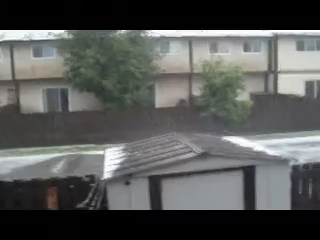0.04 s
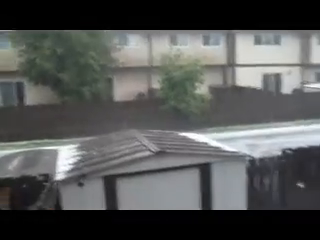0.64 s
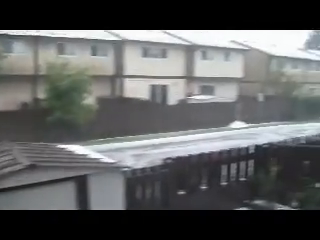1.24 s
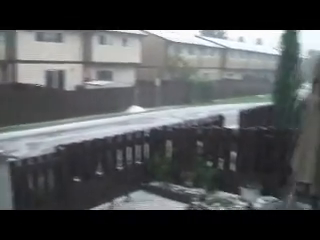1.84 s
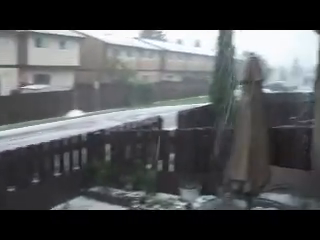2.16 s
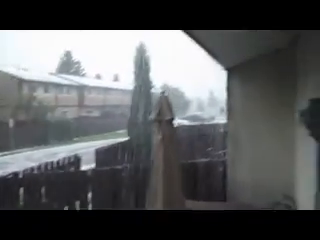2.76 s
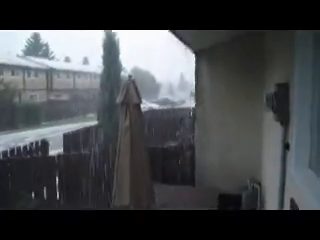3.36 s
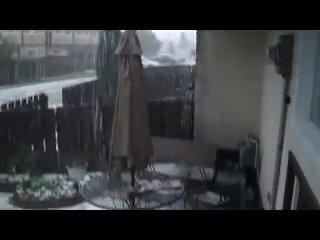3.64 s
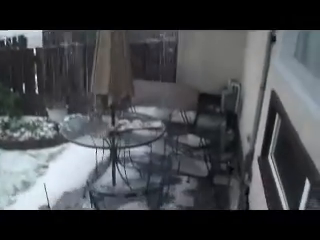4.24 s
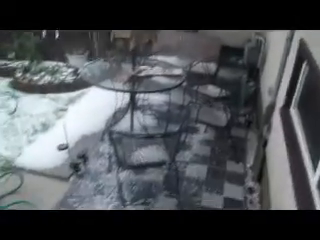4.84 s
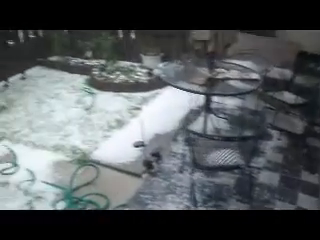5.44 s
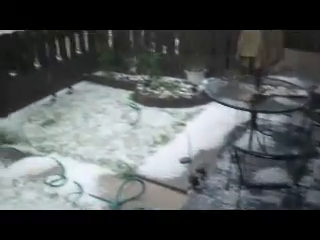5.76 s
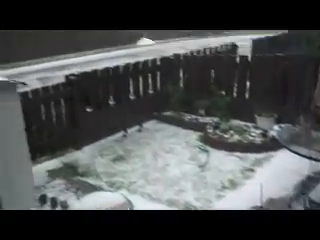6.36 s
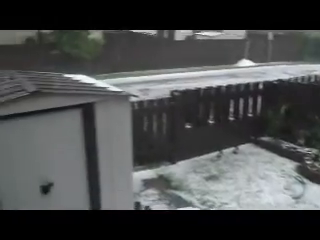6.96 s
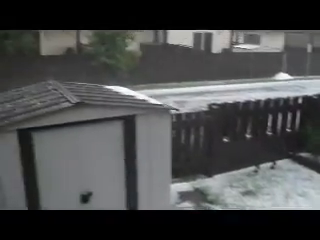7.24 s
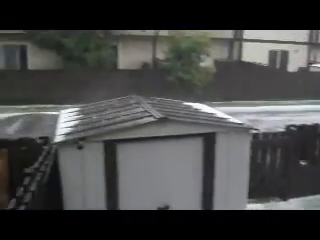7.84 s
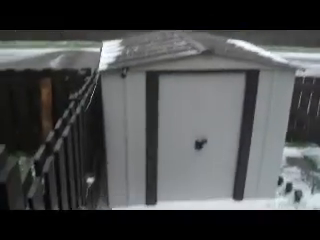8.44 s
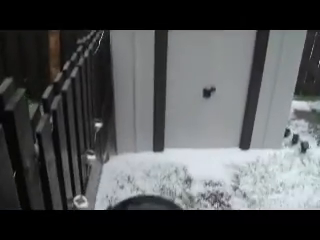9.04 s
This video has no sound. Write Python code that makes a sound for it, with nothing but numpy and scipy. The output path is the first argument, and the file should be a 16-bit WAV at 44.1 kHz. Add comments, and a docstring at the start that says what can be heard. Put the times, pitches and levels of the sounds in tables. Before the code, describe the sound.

Heavy hail and rain pelt a backyard, drumming on roofs while close stones crack sharply and ping off metal.

```python
"""Backyard hailstorm

Heavy hail and rain, taken in mono on a small microphone under the eaves. At the back the shed and
house roofs drum; across the yard countless small stones patter and shatter on paving and fence.
Close in, big ones crack and ring sheet metal. The first second fades up; the loudest cracks clip."""
import sys
import numpy as np
from scipy import signal
from scipy.fft import rfft, irfft
from scipy.io import wavfile
from scipy.ndimage import uniform_filter1d

SR = 44100
rng = np.random.default_rng(int(sys.argv[2]) if len(sys.argv) > 2 else 0)


def master(y):
    """Save y as 16-bit WAV."""
    cut = np.clip(np.atleast_2d(y).T, -1, 1)
    pcm = np.round(cut * 32767)  # scale
    wavfile.write(sys.argv[1], SR, pcm.astype(np.int16))


N = 405279
TIME = np.arange(N) / SR


def undb(db):
    """Decibels to gain."""
    return 10 ** (np.asarray(db) / 20)


def unit(x):
    """Scale to rms 1."""
    return x / np.sqrt(np.mean(x ** 2))


def gains(curve):
    """The dB columns of a timed curve as gains, sample by sample."""
    times, *columns = np.transpose(curve)
    return [undb(np.interp(TIME, times, db)) for db in columns]


def decay(t60, size=16384):
    """Exponential fall of 60 dB in t60 seconds."""
    return np.exp(-np.log(1000) * TIME[:size] / t60)


def ring(hz, t60, size=16384):
    """One struck mode: a damped sine."""
    return np.sin(2 * np.pi * hz * TIME[:size]) * decay(t60, size)


def through(x, response):
    """Convolve with an impulse response."""
    return signal.oaconvolve(x, response)[:N]


def add(out, s, sound):
    """Mix a sound in at s seconds."""
    start = int(np.clip(s * SR, 0, N - 1))
    out[start:start + len(sound)] += sound[:N - start]


def colour(spectrum, size=8192):
    """Minimum-phase impulse response with the given spectrum."""
    hz, db = np.transpose(spectrum)
    bins = np.maximum(np.fft.rfftfreq(size, 1 / SR), 1)
    magnitude = undb(np.interp(np.log(bins), np.log(hz), db))
    cepstrum = irfft(np.log(magnitude))
    cepstrum[1:size // 2] *= 2
    cepstrum[size // 2 + 1:] = 0
    return irfft(np.exp(rfft(cepstrum)))


def impacts(per_s, spread_db):
    """Randomly timed blows: many small, a few large."""
    hits = rng.random(N) < per_s / SR
    sizes = undb(spread_db * np.minimum(rng.exponential(size=N), 5))
    return hits * sizes * rng.choice([-1, 1], N)


def yard(direct, t60, echo_db):
    """Walls and fence return each blow to the microphone as a short diffuse tail."""
    tail = decay(t60) ** 2
    energy = np.abs(through(direct ** 2, tail / tail.sum()))
    return direct + undb(echo_db) * np.sqrt(energy) * rng.standard_normal(N)


# Spectrum of the roofs at the back: f/Hz, level/dB
ROOF_SPECTRUM = [(60, -26), (145, -12), (190, 1.5), (220, -1.5), (255, -4), (350, -2), (450, -1), (530, 2),
                 (660, -1), (780, .5), (1000, -1.5), (1250, 0), (1750, -4.5), (2400, -18.5), (4000, -53.5)]
def roofs():
    """Farthest off, blows on the shed and house roofs merge into a hollow drumming."""
    blows = impacts(per_s=1100, spread_db=2.5)
    return unit(through(yard(blows, t60=0.11, echo_db=-3), colour(ROOF_SPECTRUM)))


# Spectrum of the shed panels: f/Hz, level/dB
PANEL_SPECTRUM = [(22, 3), (35, -22), (50, 8), (68, 5.5), (97, 1.5), (118, 4.5), (145, -9), (220, -32)]
def shed_boom():
    """Behind the yard, the wide shed panels answer the pelting with a low boom."""
    return unit(through(impacts(per_s=670, spread_db=3.0), colour(PANEL_SPECTRUM)))


# Spectrum of splashes on the patio: f/Hz, level/dB
SPLASH_SPECTRUM = [(4000, -43), (7500, 3), (9500, 6.5), (12200, 7), (14000, 5), (15500, -3)]
def spray():
    """Out on the wet patio, raindrops and slush splash with a fine bright fizz."""
    drops = impacts(per_s=8100, spread_db=5.0)
    return unit(through(yard(drops, t60=0.062, echo_db=-2.0), colour(SPLASH_SPECTRUM)))


# Modes of the sheet metal: f/Hz, relative level/dB, t60/s
METAL_MODES = [(1210, -14.5, 0.055), (2110, -14, 0.039), (2440, -13, .06), (2728, -4.5, 0.04)]
def metal_tinkle():
    """Over by the shed, sheet metal tinkles; every spot that is hit favours another mode."""
    out = np.zeros(N)
    for hz, db, t60 in METAL_MODES:
        blows = impacts(per_s=120, spread_db=2.5)
        out += undb(db) * unit(through(blows, ring(hz, t60)))
    return unit(out)


def flurries(per_s, t60, depth):
    """A gain that surges as each bursting stone throws splinters, which quickly thin out."""
    showers = through(np.abs(impacts(per_s, spread_db=4.0)), decay(t60))
    return np.sqrt(1 + depth * np.abs(showers) / showers.mean())


# Spectrum of small ice landing in the yard: f/Hz, level/dB
ICE_SPECTRUM = [(700, -17), (1400, -17), (2100, -8), (2900, -5.5), (3700, -4.5), (4500, -1.5), (6200, 0.5),
                (7200, -2), (8500, -7), (10000, -12.5), (15500, -22.5)]
def patter():
    """In the middle distance, small hail peppers paving, fence and lawn."""
    ticks = impacts(per_s=12000, spread_db=2.5) * flurries(per_s=160, t60=0.034, depth=0.84)
    return unit(through(yard(ticks, t60=0.044, echo_db=-3.5), colour(ICE_SPECTRUM)))


def crack(hz, cycles, size=1536):
    """Ice on a hard surface: a pitched snap that peaks after `cycles` periods, then dies."""
    age = TIME[:size] * hz / cycles
    return age * np.exp(1 - age) * np.sin(2 * np.pi * hz * TIME[:size])


def pellets(mid_hz, octaves, cycles, spread_db, count):
    """Single stones stand forward of the patter, each with the pitch of its size."""
    out = np.zeros(N)
    for when, rank, up, length, down in rng.random((count, 5)):
        hz = np.clip(mid_hz * 2 ** (octaves * (up - down)), 800, 13000)
        db = -spread_db * np.log(max(rank, .02))
        add(out, when * N / SR, undb(db) * crack(hz, cycles * (.5 + length)))
    return out


# Hits on sheet metal, garden furniture or a shed panel: t/s, level/dB before trim, f/Hz, t60/s
PLATE_HITS = [(1.34, -19, 2050, 0.11), (1.36, -24, 1190, 0.12), (1.782, -22, 2750, 0.13),
              (2.625, -15, 2410, 0.07), (2.821, -20, 1190, 0.21), (3.771, -34.5, 90, 0.45),
              (5.36, -17, 2790, 0.072), (6.045, -19, 2210, 0.1), (6.301, -31.5, 260, .22),
              (6.495, -18, 2780, 0.082), (7.026, -20, 2690, .1), (7.372, -19, 2130, 0.11),
              (7.43, -19, 2130, .08), (7.445, -18, 2720, 0.093), (8.096, -24, 2750, 0.097),
              (8.196, -18.5, 2730, 0.12), (8.25, -19, 2770, .1)]
def pings(trim_db, detune, neighbour_db):
    """Nearby, a stone rings one mode of a thin plate; two neighbours beat with it and die sooner."""
    out = np.zeros(N)
    for s, db, hz, t60 in PLATE_HITS:
        up, down = detune * (.5 + rng.random(2))
        neighbours = ring(hz * (1 + up), t60 / 2) + ring(hz * (1 - down), t60 / 2)
        add(out, s, undb(db + trim_db) * (ring(hz, t60) + undb(neighbour_db) * neighbours))
    return out


# Big stones landing close: t/s, crack level/dB, f/Hz, splinter level/dB (levels before trim)
CLOSE_STONES = [(0.5375, 4, 6570, -9.5), (0.6095, 0, 6760, -6), (0.8791, -1, 6720, -10.5),
                (0.909, 1, 4800, -8), (1.0108, -6, 5930, -13), (1.032, -1.5, 6210, -11.5),
                (1.201, -2, 7430, -17.5), (1.245, -6, 5870, -8.5), (1.406, -5, 4830, -12),
                (1.5121, 5, 7360, -23), (1.754, -3, 5970, -15), (2.03, -3, 6350, -17),
                (2.095, -4, 6400, -11.5), (2.1952, 2, 6680, -14.5), (2.3825, 0, 6430, -16),
                (3.1788, -10, 6110, -12.5), (3.6537, -7, 6060, -11), (4.1597, 2, 4600, -27),
                (4.3006, 9, 7400, -14), (4.3695, -1, 6270, -12.5), (4.795, 6, 5830, -20),
                (4.9841, 0, 9990, -12), (5.3473, -5, 6000, -11.5), (5.456, 3, 5870, -22),
                (5.498, 2, 6630, -23), (5.5535, 3, 5530, -27), (5.8685, -2.5, 5880, -12),
                (5.9384, 2.5, 7080, -23.5), (6.342, 5.5, 7460, -17), (6.752, 5, 5300, -17),
                (6.836, -3, 6320, -12), (6.94, -6, 5010, -15), (7.0804, -2.5, 6440, -31),
                (7.1478, -11, 6390, -12), (7.1835, -10, 4550, -10), (7.285, 0, 6130, -13.5),
                (7.4146, -6, 6580, -11), (7.4433, -8, 5350, -15), (7.5272, -8, 4560, -11),
                (7.5513, -4, 6270, -16), (7.684, -6, 5380, -8.5), (7.7614, -1, 5200, -8),
                (7.939, -5, 5870, -10.5), (8.091, 3.5, 5660, -10), (8.2155, 1, 5800, -14),
                (8.3907, 5, 5100, -24), (8.469, -5, 5240, -13.5), (8.5793, -6, 6310, -9),
                (8.6176, -7, 5890, -7.5), (8.7974, -3, 5700, -12.5), (8.952, -4, 4970, -13),
                (8.9771, -4, 5640, -14.5), (9.0026, 3, 5640, -16.5), (9.023, -1, 6510, -16),
                (9.1443, -1, 5500, -10.5)]
def big_stones(crack_trim_db, splinter_trim_db, cycles, stretch, scatter_t60):
    """Close to the microphone a stone cracks and scatters; the more it shatters, the longer the crack."""
    out = np.zeros(N)
    splinters = unit(through(impacts(per_s=5100, spread_db=1), colour(ICE_SPECTRUM)))
    thinning = decay(scatter_t60)
    typical_db = np.median(np.array(CLOSE_STONES)[:, 3])
    for s, crack_db, hz, splinter_db in CLOSE_STONES:
        rise_cycles = cycles * undb(stretch * (splinter_db - typical_db))
        shower = thinning * np.roll(splinters, -int(s * SR))[:len(thinning)]
        add(out, s - rise_cycles / hz, undb(crack_db + crack_trim_db) * crack(hz, rise_cycles))
        add(out, s, undb(splinter_db + splinter_trim_db) * shower)
    return out


def clumps(spread_db, per_s=17):
    """Stones arrive in clumps: a gain that glides between random levels."""
    hold = int(SR / per_s)
    steps = np.repeat(rng.standard_normal(N // hold + 1), hold)
    return undb(spread_db * unit(uniform_filter1d(steps, hold)[:N]))


def facing(s, width_s, lift_db):
    """A surface comes up in level as the microphone swings past it, on axis at s seconds."""
    return undb(lift_db * np.exp(-((TIME - s) / width_s) ** 2))


# The fall swells and slackens in squalls: t/s, ground level/dB, roof level/dB (before the mix gains)
SQUALLS = [(0.9, -16, -27), (1.1, -19, -29.5), (1.34, -14, -25.0), (1.54, -19.5, -30), (1.76, -13.5, -26.5),
           (2.02, -18.7, -29), (2.44, -18.0, -33.5), (2.48, -16, -29), (3.92, -17, -29), (4.3, -16, -30),
           (4.44, -17.5, -29.5), (4.74, -14.5, -27.5), (4.84, -21.5, -33.5), (4.96, -17.0, -29),
           (5.98, -18.5, -32.0), (6.28, -16.5, -28), (6.56, -19, -34), (6.94, -15.5, -27.2),
           (7.26, -17.5, -30.2), (7.76, -17, -26.8), (7.86, -20, -31.5), (8.1, -15.5, -29.5),
           (8.14, -19.5, -29), (9.18, -17.0, -30.7)]
def scene():
    """From under the eaves: squalls drive the roofs and the yard, with the close hits in front."""
    on_ground, on_roofs = gains(SQUALLS) * clumps(spread_db=0.91)
    on_patio = on_ground * facing(s=4.3, width_s=3.5, lift_db=5.0)
    on_shed = on_roofs * clumps(spread_db=0.5) * undb(-0.5 * TIME)  # eases by 0.5 dB a second
    toward_shed = facing(s=7.9, width_s=0.9, lift_db=3.5)
    clacks = pellets(mid_hz=5400, octaves=0.73, cycles=0.88, spread_db=2.5, count=1100)  # wood, plastic
    ticks = pellets(mid_hz=6700, octaves=0.88, cycles=0.64, spread_db=1.5, count=350)  # hard paving
    snaps = pellets(mid_hz=7500, octaves=0.46, cycles=0.81, spread_db=0.5, count=55)  # nearest slabs
    # glass and wire furniture ring longer
    clinks = pellets(mid_hz=5900, octaves=0.55, cycles=21, spread_db=2.5, count=400)
    ice = undb(-0.36) * patter() + undb(-1.5) * clacks + undb(5.0) * ticks + undb(8.8) * snaps
    ice += undb(-9) * clinks + undb(-20) * toward_shed * metal_tinkle()
    near = big_stones(crack_trim_db=-1.5, splinter_trim_db=0.5, cycles=1.3, stretch=0.52,
                      scatter_t60=0.072)
    near += pings(trim_db=0.5, detune=0.042, neighbour_db=-8.5)
    far = undb(-1.11) * on_roofs * clumps(spread_db=1.03) * roofs()
    far += undb(-12) * on_shed * shed_boom()
    middle = on_ground * ice + undb(-15) * on_patio * spray()
    mix = far + middle + near
    return np.array([mix, mix])


# The microphone channel fading up: t/s, level/dB
FADE_UP = [(0.21, -31), (0.4, -22), (0.6, -10), (0.74, -7), (0.79, -4), (0.95, -0.5)]
def record(dry):
    """The microphone channel opens a moment late, fades up, clips the loudest cracks and cuts the top."""
    start_s, ceiling, top_hz = 0.203, 0.93, 15600
    opening, = gains(FADE_UP)
    clipped = np.clip(dry * opening * (TIME > start_s), -ceiling, ceiling)
    lowpass = signal.firwin(401, top_hz, fs=SR)
    return signal.oaconvolve(clipped, lowpass[None], mode="same", axes=1)


dry = scene()
out = record(dry)
master(out)
```